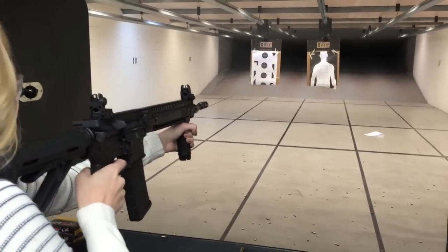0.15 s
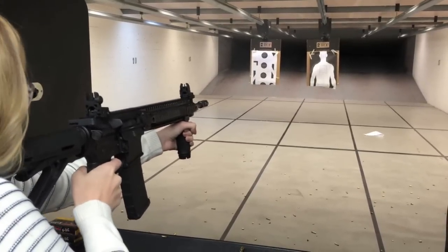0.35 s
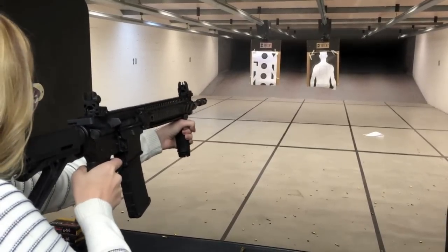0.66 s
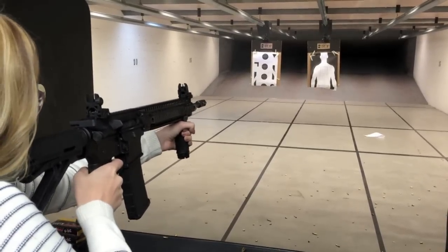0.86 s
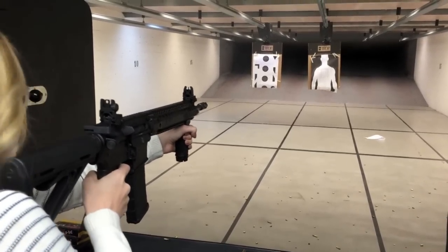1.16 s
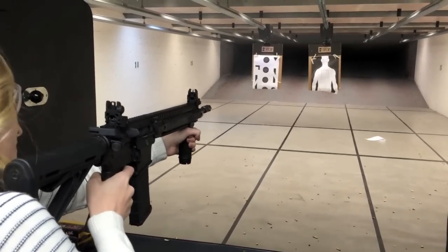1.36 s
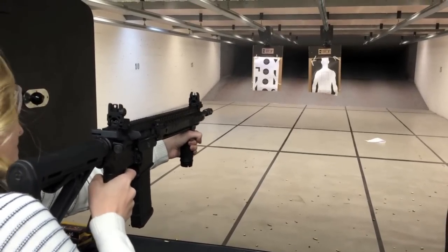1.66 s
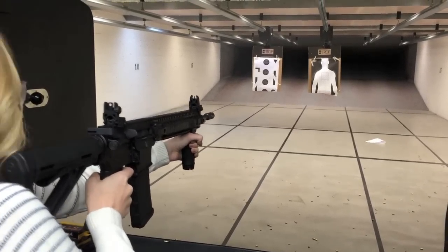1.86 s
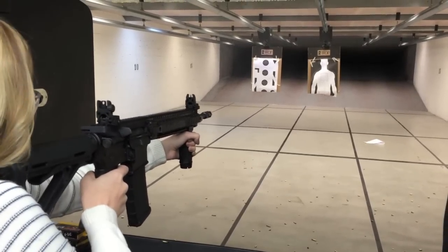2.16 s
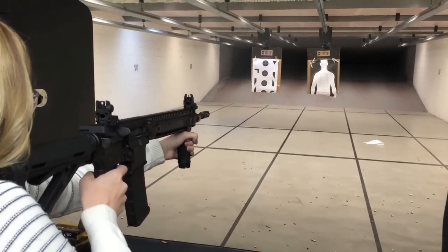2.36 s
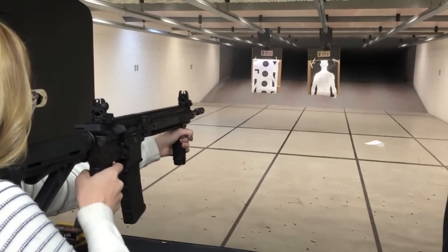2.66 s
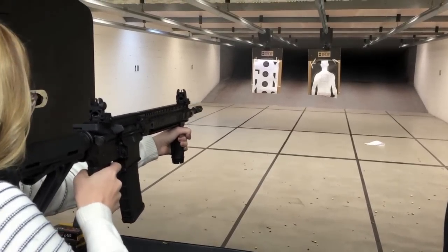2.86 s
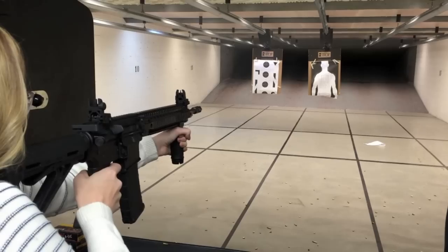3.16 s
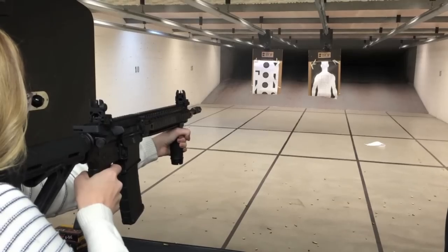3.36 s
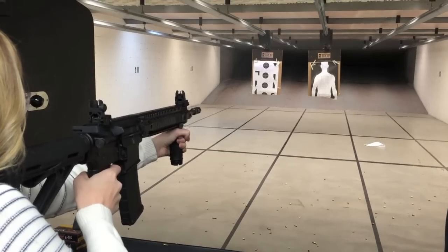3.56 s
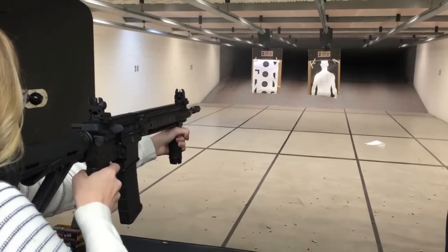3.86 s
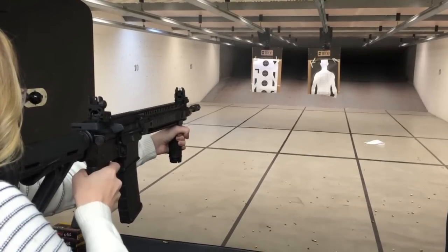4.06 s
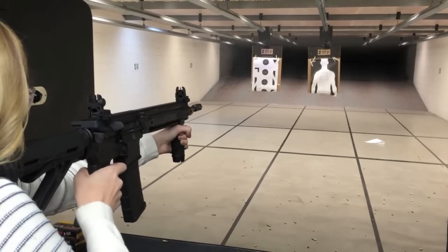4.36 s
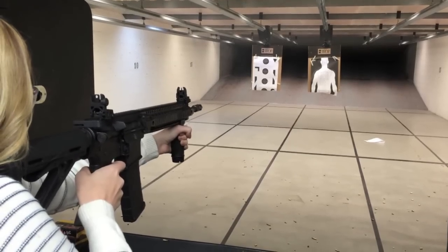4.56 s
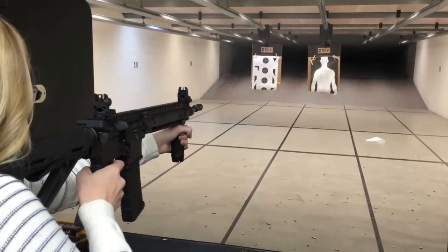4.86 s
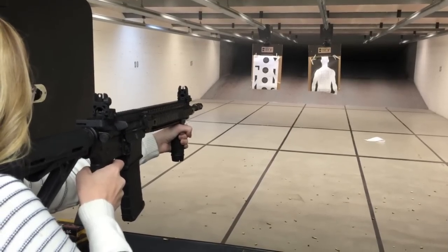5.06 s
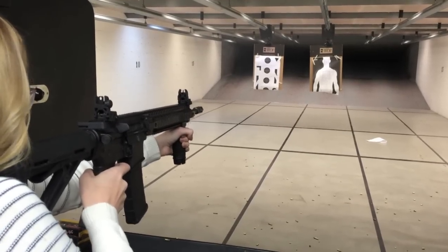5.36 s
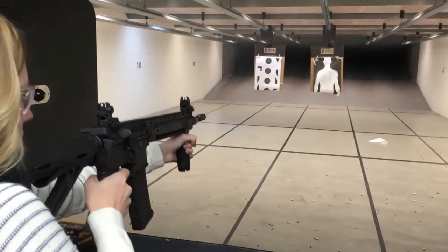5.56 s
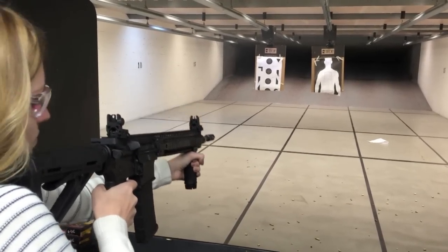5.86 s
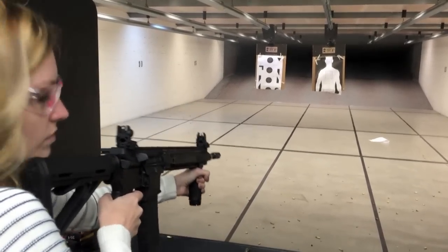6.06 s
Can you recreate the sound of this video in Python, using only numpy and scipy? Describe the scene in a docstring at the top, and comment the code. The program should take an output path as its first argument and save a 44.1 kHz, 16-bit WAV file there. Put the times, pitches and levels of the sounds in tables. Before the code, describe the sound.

Two single rifle shots, several seconds apart, boom through a concrete indoor range with long echoes over low ventilation rumble, with small metallic clacks between.

```python
"""A rifle fires twice in a booth of an indoor range, after the dying tail of an earlier shot.
Each blast is shaped noise: a crack in the booth, a swell in the concrete hall, far-wall echoes and late rolls.
Gear, hammer and the spent case's hardest strike are noise bursts; case and bench ring as decaying sines.
Ventilation rumbles and hisses underneath as steady, slightly wavering noise.
The recorder's gain control flattens each shot into a long roar, then lets the air noise swell back."""
import sys
import numpy as np
from scipy import signal
from scipy.fft import rfft, irfft, next_fast_len
from scipy.io import wavfile
from scipy.ndimage import uniform_filter1d, minimum_filter1d

SR = 44100
rng = np.random.default_rng(int(sys.argv[2]) if len(sys.argv) > 2 else 0)


def store_pcm(level_fs):
    """Save levels as 16-bit WAV."""
    pcm = np.round(np.clip(level_fs, -1, 1) * 32767).astype(np.int16)
    wavfile.write(sys.argv[1], SR, np.atleast_2d(pcm).T)


N = 273859  # length in samples


def amp(db):
    """Decibels to gain."""
    return 10 ** (np.asarray(db) / 20)


def evened(x):
    """Scales to rms 1."""
    return x / np.sqrt(np.mean(x ** 2) + 1e-20)


def read(table, hz, axis=1):
    """Interpolates one column of a table along a log-frequency axis."""
    columns = np.transpose(table)
    return np.interp(np.log(hz + 1), np.log(columns[0] + 1), columns[axis])


def add(mix, start_s, sound):
    """Mixes a sound in at start_s, which may lie before the start of the scene."""
    at = round(start_s * SR)
    sound = sound[max(-at, 0):]
    part = mix[max(at, 0):][:len(sound)]
    part += sound[:len(part)]


def pink(size):
    """Spectrum of noise with equal power in every octave (rms 1 each), and its frequencies."""
    hz = np.fft.rfftfreq(size, 1 / SR)
    white = rfft(rng.standard_normal(size))
    return white * np.sqrt(SR / (2 * np.log(2) * np.maximum(hz, 20))), hz


# Ventilation colour, duct rumble below and vent hiss above: pitch_hz [Hz], level_db [dB per octave]
VENTILATION = [(20, -68), (35, -59), (50, -48), (63, -41), (80, -45.5), (105, -38.5), (145, -42),
               (190, -52), (300, -54), (900, -56.5), (1350, -54), (1700, -48), (2400, -54), (3300, -47.5),
               (4900, -50.5), (6300, -53.5), (10000, -58), (15000, -62)]


def ventilation(waver_db=.5):
    """Turbulent air is steady coloured noise; its flow wavers slightly, a few times a second."""
    spectrum, hz = pink(2 * next_fast_len(N // 2 + 1, real=True))
    air = irfft(spectrum * amp(read(VENTILATION, hz)))[:N]
    waver = signal.resample(rng.standard_normal(40), 640)
    flow = np.interp(np.arange(N), np.linspace(0, N, len(waver)), amp(waver_db * waver))
    return air * flow


def struck(blows, modes, contact_s=.00008):
    """Every blow sets an object's modes ringing as decaying sines; contact_s softens the onset."""
    out, t = np.zeros(N), np.arange(SR // 2) / SR
    ring = sum(amp(db - 60 * t / t60) * np.sin(2 * np.pi * hz * t) for hz, db, t60 in modes)
    onset = 1 - np.exp(-t / contact_s)
    for start_s, level_db in blows:
        add(out, start_s, amp(level_db) * ring * onset)
    return out


# Bounces of the spent brass case: start_s [s], level_db [dB]
CASE_BOUNCES = [(4.5958, -48), (4.712, -49), (4.959, -30)]
# Ringing modes of the case: pitch_hz [Hz], level_db [dB], t60_s [s]
CASE_MODES = [(7262, 0, .22), (7295, -8, .22), (13210, -8, .2), (12900, -14, .3), (14580, -14, .12)]


def spent_case():
    """A light brass shell rings in high modes at each bounce."""
    return struck(CASE_BOUNCES, CASE_MODES)


# Colour shared by all clacks: pitch_hz [Hz], level_db [dB per octave]
CLACK_COLOUR = [(60, -58), (280, -32), (480, -22), (900, -21), (1300, -16), (2100, -6), (2900, -8),
                (4500, -6), (9000, -5), (15000, -7.5)]


def clack(level_db, contact_s, t60_s, ring_hz, tilt_db, ring_db=7, width_octaves=.22):
    """Hard parts chatter while they touch, then die away, with one main resonance."""
    t = np.arange(8192) / SR
    spectrum, hz = pink(len(t))
    resonance = np.exp(-(np.log2((hz + 1) / ring_hz) / width_octaves) ** 2)
    tilt = tilt_db * np.log2(np.maximum(hz, 300) / 3000)  # tilt_db per octave about 3 kHz
    burst = evened(irfft(spectrum * amp(read(CLACK_COLOUR, hz) + ring_db * resonance + tilt)))
    decay = amp(level_db - 60 * np.maximum(t - contact_s, 0) / t60_s)
    return burst * decay * (1 - np.exp(-t / .0003))


# Dull knock on the bench: start_s [s], level_db [dB]
BENCH_KNOCKS = [(5.0488, -3.5)]
# Ringing modes of the bench: pitch_hz [Hz], level_db [dB], t60_s [s]
BENCH_MODES = [(1100, -10, .03), (1280, -8, .018), (1884, 0, .022), (1990, 0, .024), (3176, -16, .015),
               (4452, -24, .04)]


def bench_knock(click_db=-11):
    """The bench rings in short, damped modes, topped by a click of contact (click_db relative)."""
    out = struck(BENCH_KNOCKS, BENCH_MODES, contact_s=.0003)
    for start_s, level_db in BENCH_KNOCKS:
        click = clack(level_db + click_db, contact_s=.001, t60_s=.02, ring_hz=4000, tilt_db=-4.3)
        add(out, start_s, click)
    return out


# Clacks of rifle and gear, and the spent case striking (4.9572): start_s [s], level_db [dB],
# contact_s [s], t60_s [s], ring_hz [Hz], tilt_db [dB per octave]
HARD_CLACKS = [(2.9957, -14, .0015, .014, 9200, 0), (3.0024, -10.3, .004, .036, 3400, .6),
               (3.0262, -6, .0035, .005, 6300, -.7), (3.0318, -15, .002, .06, 6300, -2),
               (4.9572, -15.8, .0045, .035, 2400, -4.7), (5.6858, -37, .002, .04, 7000, 1.5)]


def hard_clacks():
    """Handled rifle and gear, and the case's hardest strike: short bursts, each with its own resonance."""
    out = np.zeros(N)
    for start_s, *blow in HARD_CLACKS:
        add(out, start_s, clack(*blow))
    return out


def hammer(lead_s=.011, level_db=-26):
    """The hammer falls just before every blast, a dull clack of metal."""
    out = np.zeros(N)
    for start_s, *_ in SHOTS:
        fall = clack(level_db, contact_s=.003, t60_s=.028, ring_hz=1000, tilt_db=-9)
        add(out, start_s - lead_s, fall)
    return out


def near_room(x, booth_db=-19, booth_t60=.13, echo_db=-28.5, echo_s=.122, echo_t60=.16):
    """Small sounds get a short ring from the booth and a faint echo from the far wall."""
    t, response = np.arange(SR // 4) / SR, np.zeros(SR // 2)
    for delay_s, level_db, t60_s in [(.003, booth_db, booth_t60), (echo_s, echo_db, echo_t60)]:
        taps = rng.standard_normal(len(t)) * amp(-60 * t / t60_s)
        add(response, delay_s, amp(level_db) * taps / np.linalg.norm(taps))
    return x + signal.oaconvolve(x, response)[:N]


def reverberation(table, rise_s, size, count, modes=(), loss_db_per_hz=0):
    """Dense reflections, count samples long, build up, then die in each band at its own speed."""
    spectrum, hz = pink(count)
    resonance_db = sum(db / (1 + ((hz - centre) / width) ** 2) for centre, width, db in modes)
    noise = irfft(spectrum * amp(read(table, hz) + resonance_db - loss_db_per_hz * hz))
    hz, t, bands = signal.stft(noise, SR, nperseg=size)
    bands = bands * amp(-60 * t / read(table, hz, axis=2)[:, None])
    tail = signal.istft(bands, SR, nperseg=size)[1][:count]
    return tail * (1 - np.exp(-np.arange(count) / SR / rise_s)) ** 2


# The next five share columns: pitch_hz [Hz], level_db [dB per octave], t60_s [s]
# Blast among the booth walls
BOOTH_BLAST = [(25, -30, .3), (70, -9, .3), (250, 2, .22), (700, 10, .22), (1600, 14.5, .23),
               (3300, 18, .25), (7000, 14.5, .21), (14000, 9.5, .17)]
# Reverberation of the concrete hall
HALL_REVERB = [(25, -31, 2), (65, -7, 2.2), (130, 3, 2), (230, 5.5, 1.27), (420, 15.3, 1.2),
               (750, 18.8, 1.15), (1100, 18.5, 1.13), (1600, 12, 1.16), (3000, 9.2, 1.07), (6000, 3.5, .87),
               (11000, -3, .55), (15000, -6.5, .44)]
# Sound lingering along the length of the hall
HALL_LINGER = [(25, -45, 4), (120, -19.5, 4.4), (240, -29, 3.1), (480, -15.5, 3.2), (1000, -12.3, 2.95),
               (1700, -19, 2.5), (4000, -24, 1.6), (12000, -45, .7)]
# Echo from the far wall
WALL_ECHO = [(30, -40, .5), (200, -7, .5), (900, 4, .45), (2000, 10, .38), (3500, 11.5, .36),
             (7000, 7, .33), (14000, -1, .26)]
# Late, dull boom rolling back up the hall
DULL_ROLL = [(25, -35, .8), (120, -9, .8), (240, -19, .7), (500, -15, .7), (1000, -15, .65),
             (2000, -30, .5), (8000, -65, .3)]
# Resonances of the hall: pitch_hz [Hz], width_hz [Hz, centre to half the dB], boost_db [dB]
HALL_RESONANCES = [(66, 8, 3), (112, 10, 4), (164, 10, 3), (206, 7, 3), (290, 15, -2), (350, 12, 4),
                   (418, 8, 5), (744, 7, 5), (880, 16, 3), (1072, 9, 5)]
# Returns of the boom after every blast: delay_s [s], level_db [dB relative to the blast]
ROLL_RETURNS = [(.3, 2), (.71, 2.5)]
# Blasts, the first only a dying tail: start_s [s], level_db [dB],
# echo_db [dB relative to the blast], echo_delay_s [s]
SHOTS = [(-1.42, 0, 0, .11), (.3945, .6, 4, .111), (4.0345, -1.2, 1.3, .105)]


def shots(second_trip_s=.24, second_trip_db=-4.5):
    """Each blast rattles in the booth, swells in the hall, echoes twice off the far wall and rolls away."""
    out = np.zeros(N)
    for start_s, level_db, echo_db, echo_delay_s in SHOTS:
        blast = amp(level_db)
        hall = reverberation(HALL_REVERB, rise_s=.029, size=1024, count=98304, modes=HALL_RESONANCES)
        add(out, start_s, blast * hall)
        linger = reverberation(HALL_LINGER, rise_s=.1, size=1024, count=131072, modes=HALL_RESONANCES)
        add(out, start_s, blast * linger)
        add(out, start_s, blast * reverberation(BOOTH_BLAST, rise_s=.0002, size=256, count=16384))
        echo = reverberation(WALL_ECHO, rise_s=.012, size=256, count=24576)
        add(out, start_s + echo_delay_s, amp(level_db + echo_db) * echo)
        # the second trip down the hall arrives more scattered, its treble absorbed by the air
        again = reverberation(WALL_ECHO, rise_s=.035, size=256, count=24576, loss_db_per_hz=.0008)
        add(out, start_s + second_trip_s, amp(level_db + second_trip_db) * again)
        for delay_s, roll_db in ROLL_RETURNS:
            roll = reverberation(DULL_ROLL, rise_s=.04, size=1024, count=32768)
            add(out, start_s + delay_s, amp(level_db + roll_db) * roll)
    return out


def scene():
    """Air, small hard sounds and shots at one microphone."""
    small = spent_case() + bench_knock() + hard_clacks() + hammer()
    return (ventilation() + near_room(small) + shots())[None]


def held(over_db, db_per_s):
    """Follows every rise at once and sinks back at a steady rate."""
    fall = np.arange(N) / SR * db_per_s
    return np.maximum.accumulate(over_db + fall) - fall


def gain_control(x, limit_db=-10.5, fast_db_per_s=140., slow_db_per_s=22., slow_range_db=14.3,
                 hold_s=.15, treble_db=-4):
    """A quick limiter, keener on treble, holds the roar; a slower stage waits, then eases the gain back."""
    treble = amp(treble_db) * np.diff(x, prepend=0)
    power = uniform_filter1d(x ** 2 + treble ** 2, size=220)
    over_db = np.maximum(10 * np.log10(abs(power) + 1e-12) - limit_db, 0)
    half = round(hold_s * SR / 2)
    # the highest excess within the past hold time
    recent_db = -minimum_filter1d(-over_db, 2 * half + 1, origin=half)
    fast_cut_db = held(over_db, fast_db_per_s)
    slow_cut_db = held(np.minimum(recent_db, slow_range_db), slow_db_per_s)
    cut_db = np.maximum(fast_cut_db, slow_cut_db)
    return x * amp(-uniform_filter1d(cut_db, size=170))


def record(dry, ceiling=.72, edge_hz=15350):
    """Gain control, softly rounded peaks, then a low-pass at edge_hz."""
    x = gain_control(dry[0])
    x = x / (1 + (x / ceiling) ** 6) ** (1 / 6)
    lowpass = signal.firwin(301, edge_hz, window=("kaiser", 9), fs=SR)
    return signal.oaconvolve(x, lowpass, "same")[None]


dry = scene()
out = record(dry)
store_pcm(out)
```